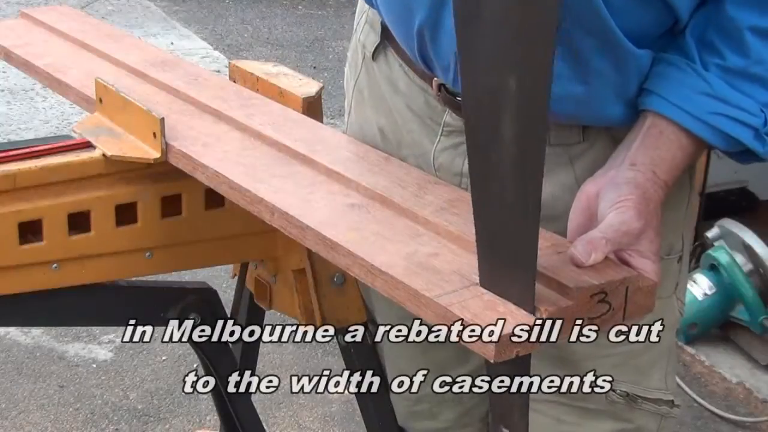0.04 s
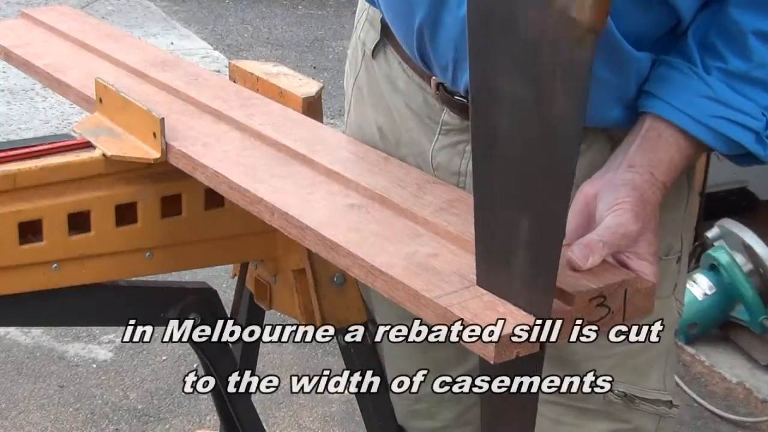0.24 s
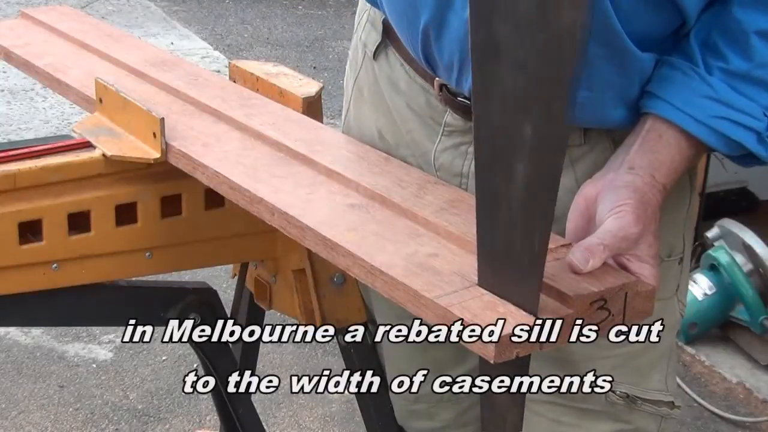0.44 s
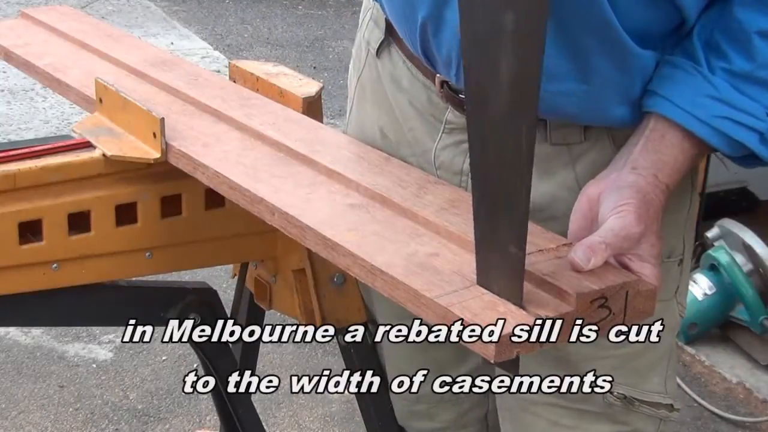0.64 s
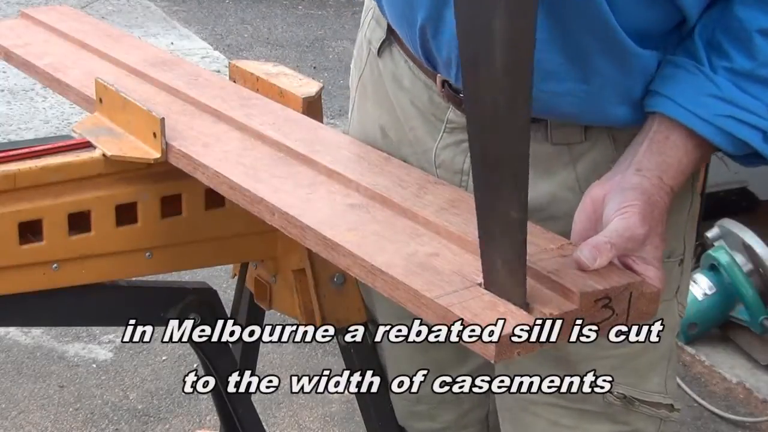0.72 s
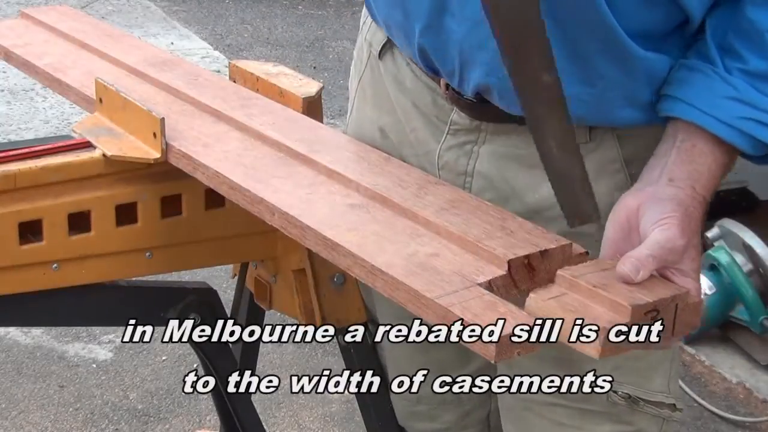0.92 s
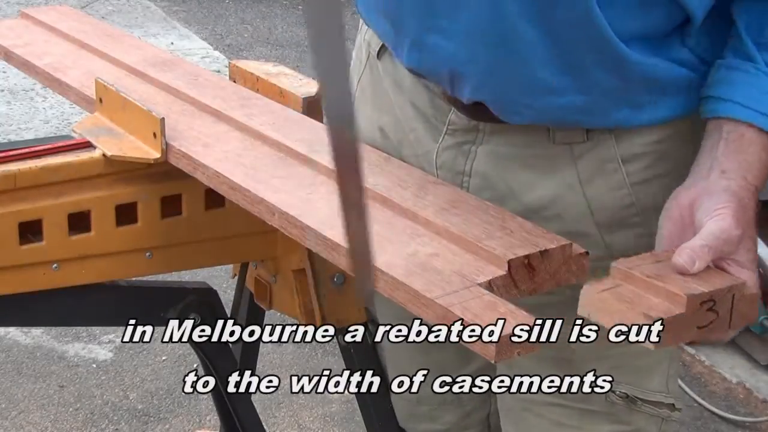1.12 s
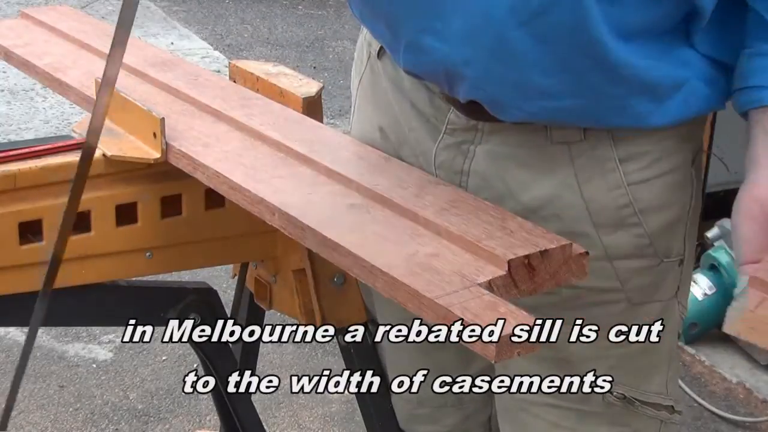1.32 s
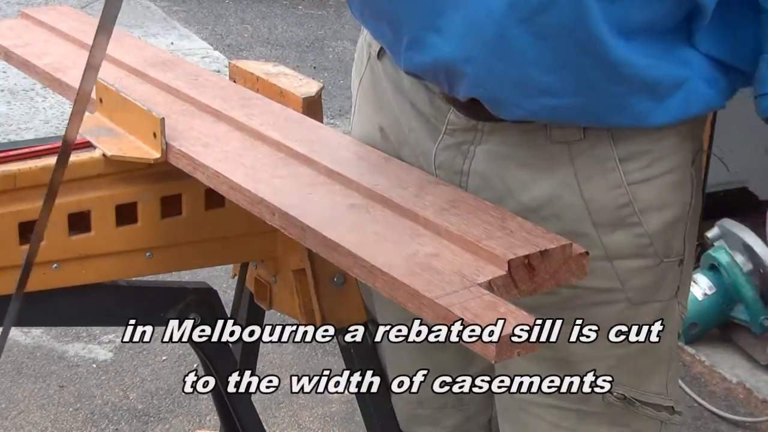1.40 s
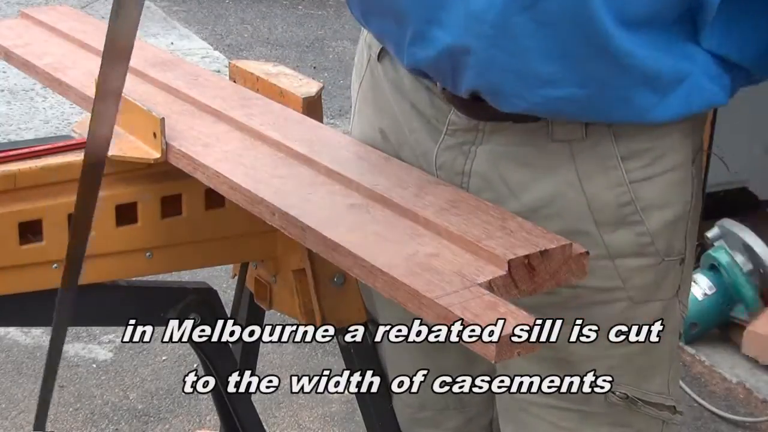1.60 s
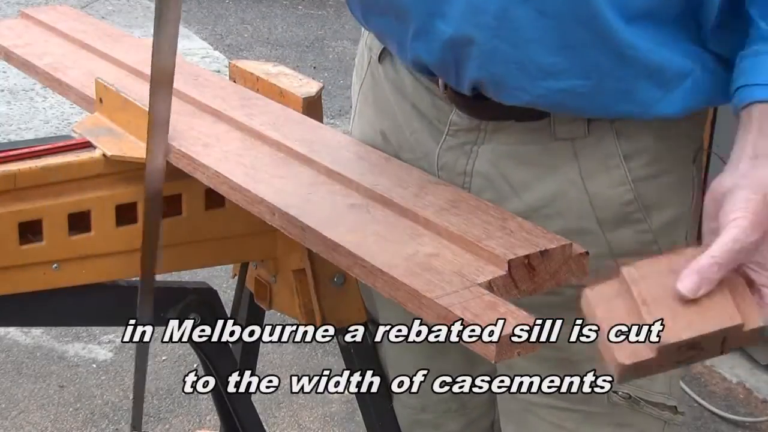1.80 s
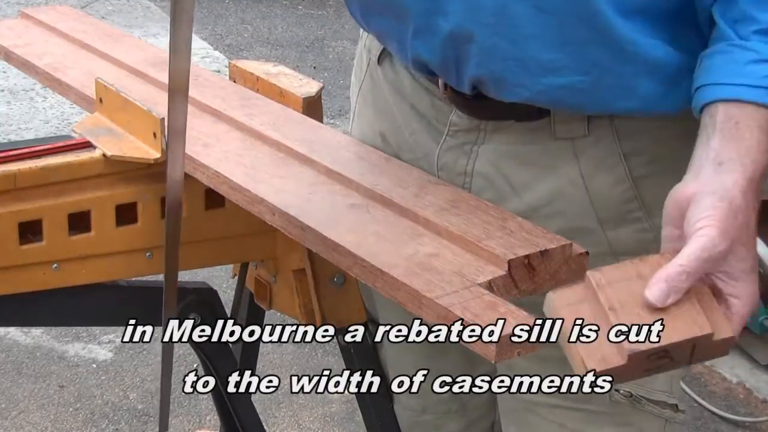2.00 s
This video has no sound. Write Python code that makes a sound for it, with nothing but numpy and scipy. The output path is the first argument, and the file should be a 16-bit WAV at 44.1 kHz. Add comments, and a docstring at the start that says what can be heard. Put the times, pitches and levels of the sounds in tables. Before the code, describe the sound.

Close outdoor handsaw strokes rasp and ring a wooden board, fading within a second to tiny damped snaps; a brief metallic tick follows over light wind buffeting and a quiet far road hum.

```python
"""Outdoors near a road: a handsaw finishes a cut through a timber board on a trestle, close to the microphone.
Random tooth bites ring the board's resonances and tear fibres, while finer grains hiss along the blade.
The sawing weakens, the board modes shift as the offcut loosens, the last fibres snap as damped knocks,
and the blade ticks against the trestle: dry cracks that ring its modes. Shaped noise makes wind buffet
the microphone and far traffic hum; a short decaying noise wash gives the reflections close by."""
import sys
import numpy as np
from scipy import signal
from scipy.fft import rfft, irfft
from scipy.io import wavfile

SR = 44100
rng = np.random.default_rng(int(sys.argv[2]) if len(sys.argv) > 2 else 0)


def unload_wav(signal):
    """Save mono or channel-first audio to the path in sys.argv[1] as 16-bit WAV at rate SR, clipped to [-1, 1]."""
    wavfile.write(
        sys.argv[1],
        SR,
        np.round(np.clip(np.atleast_2d(signal).T, -1, 1) * 32767).astype(np.int16),
    )


N = 90449  # length in samples

# The run of strokes: t/s, low board level/dB, upper board level/dB, blade hiss level/dB
STROKE_LEVELS = [(0, -29, -23, -32.5), (.044, -33.5, -29, -39), (.075, -30, -28.5, -39.5),
                 (.103, -30.5, -34, -39.5), (.116, -53, -44, -46), (.158, -45.5, -61, -73),
                 (.19, -58, -57.5, -63.5), (.252, -39, -37, -34.5), (.264, -29.5, -30.5, -37),
                 (.3, -28, -30, -33), (.35, -29, -25.5, -38), (.39, -28, -29.5, -35.5),
                 (.41, -33.5, -35.5, -49), (.44, -43, -42.5, -54), (.466, -37.5, -32, -36),
                 (.488, -37.5, -34, -39.5), (.5, -26, -25.5, -35.5), (.53, -34.5, -30, -38.5),
                 (.555, -38, -35, -40.5), (.6, -37.5, -39, -50.5), (.625, -38.5, -39.5, -46),
                 (.668, -44.5, -43.5, -56.5), (.69, -42.5, -45, -57), (.74, -51.5, -48, -54),
                 (.795, -42, -42, -60), (.831, -56, -50, -68), (.834, -44, -59, -45), (.850, -47, -42, -78),
                 (.855, -53, -49, -50), (.868, -49, -45, -72), (.88, -52, -55, -93), (.93, -56.5, -73, -74)]
# Top of the blade hiss: t/s, level/dB
TOP_HISS_LEVELS = [(0, -31.5), (.058, -41), (.098, -38.5), (.162, -76.5), (.258, -36.5), (.33, -43),
                   (.37, -71), (.418, -70), (.468, -42), (.54, -40.5), (.682, -72), (.76, -53), (.815, -72),
                   (.838, -59), (.88, -83), (.93, -80)]
# Modes of the board: f/Hz, width/Hz while sawing, drive level/dB while sawing, f/Hz with the offcut loose
BOARD_MODES = [(422.5, 30, 0, 381), (467, 35, 8.5, 414), (673, 42, 2.5, 740), (844, 54, 0.5, 953),
               (1110, 200, -11.5, 1200), (1353.6, 30, 1.5, 1500), (1714, 108, -6, 1780),
               (2360, 110, -7, 2160), (3060, 190, -13.5, 2400)]
# Spectrum of breaking fibres: f/Hz, relative level/dB per Hz
TEARING_SPECTRUM = [(200, -3), (500, -4.5), (600, -17), (900, -9), (2000, -11.5), (4500, -17)]
# Scattered part of the saw, heard at the sides: f/Hz, level/dB
SAW_SIDE_GAIN = [(1500, -17.5), (5000, -11), (13000, -8.5)]
# Wind at the microphone: t/s, level/dB
WIND_LEVELS = [(0.0, -48), (0.04, -25), (0.07, -32), (0.19, -38), (0.22, -50.5), (0.26, -40.5), (0.33, -36),
               (0.42, -59.5), (0.5, -43.5), (0.53, -53), (0.59, -47.5), (0.66, -48), (0.77, -36),
               (0.8, -44.5), (0.95, -46), (1.0, -38), (1.1, -48.5), (1.28, -53.5), (1.6, -59.5),
               (1.62, -53), (1.8, -61.5), (2.05, -59)]
# Spectrum of that wind: f/Hz, relative level/dB per Hz
WIND_SPECTRUM = [(40, -18), (85, 0.5), (115, 4.5), (140, -0.5), (220, -9), (400, -18.5)]
# Slow shoves of air: t/s, level/dB
DEEP_WIND_LEVELS = [(0, -56), (.3, -68.5), (.85, -51), (1.08, -54), (1.3, -62), (2.05, -67)]
# Spectrum of the far road: f/Hz, relative level/dB per Hz
TRAFFIC_SPECTRUM = [(200, -2), (500, -2), (1050, 1), (2000, -9), (3600, -20), (14000, -26)]
# The far road over time: t/s, hum level/dB, air hiss level/dB
TRAFFIC_LEVELS = [(.95, -54, -67.5), (1.15, -56, -66), (1.3, -56, -70), (1.68, -56.5, -74),
                  (2.05, -57.5, -72)]
# Side against mid for the far road: f/Hz, level/dB
FAR_SIDE_GAIN = [(500, -17.5), (4000, -7.5)]
# Last fibres parting: t/s, peak level/dB
FIBRE_SNAPS = [(.8364, -29), (.8400, -27), (.8418, -28), (.8455, -33), (.8547, -30)]
# Contacts of the tick: t/s, peak level/dB, tilt of the ringing/dB per octave
TICK_CONTACTS = [(1.2103, -34, -1), (1.2112, -28, -1), (1.2133, -31, -7), (1.2150, -36, 0),
                 (1.2165, -29, 6), (1.2186, -33, 5)]
# Modes of the free blade: f/Hz, relative level/dB
BLADE_MODES = [(2230, -7), (2480, -7), (4480, 1), (4730, -2), (5290, -8), (6600, -8), (7300, -11),
               (9110, -9), (10150, -10), (11640, -11)]

BITES_PER_S, BITE_SPREAD_DB = 2500, 1.5
CLUMP_DB, CLUMP_HZ = 1.5, 117  # shared unevenness of the bites
HISS_GRAINS_PER_S, HISS_SPREAD_DB = 9000, 2
BOARD_SPLIT_HZ, BLADE_SPLIT_HZ = 1200, 9800
MODE_WANDER_DB, WANDER_HZ = 2.5, 25  # each mode is driven harder and softer as the blade moves
LOOSEN_START_S, LOOSEN_END_S, PITCH_WANDER = .62, .78, .025  # pitch wander is a fraction of the frequency
LIFT_S = .03  # fade as the teeth leave the wood
WIND_SIDE_DB, DEEP_WIND_HZ = -12.5, 55
TRAFFIC_WANDER_DB, TRAFFIC_WANDER_HZ = .6, 27
SCATTER_DB, SCATTER_T60_S, SCATTER_SIDE = -10, .08, .22  # ground and clutter nearby
SCATTER_DELAY_S, SCATTER_CUT_HZ = .003, 12000
SNAP_DAMPING, SNAP_LOW_HZ, SNAP_HIGH_HZ = 5, 700, 3500  # the hand widens the modes by this factor
SNAP_MODE_SPREAD_DB = 1.8
SCRAPE_DECAY_S, CRACK_DB, RING_DB, RING_T60_S = .0007, 3, -8, .008
BLADE_SIDE = .14  # side gain of ticks and snaps


def amp(db):
    """Gain of a level in dB."""
    return 10 ** (np.asarray(db) / 20)


def rms_one(x):
    """Scale to rms 1."""
    return x / np.sqrt(np.mean(x ** 2) + 1e-20)


def in_time(rows):
    """Interpolate the columns of a table, sample by sample."""
    times, *columns = np.transpose(rows)
    return [np.interp(np.arange(N) / SR, times, column) for column in columns]


def colour(x, points):
    """Shape a sound by a spectrum, joined up over log frequency."""
    hz, db = np.transpose(points)
    f = np.maximum(np.arange(N // 2 + 1) * SR / N, 1)
    return irfft(rfft(x) * amp(np.interp(np.log(f), np.log(hz), db)), N)


def drift(corner_hz):
    """Slow random wander of rms 1: noise through two equal one-pole low-passes."""
    r = np.exp(-2 * np.pi * corner_hz / SR)
    wander = signal.lfilter([1], [1, -2 * r, r * r], rng.standard_normal(N + SR))
    return rms_one(wander[SR:])  # the first second lets the filter settle


def cut(x, hz, kind, order=4):
    """Low-pass or high-pass."""
    return signal.sosfilt(signal.butter(order, hz, kind, fs=SR, output="sos"), x)


def grains(rate, spread_db):
    """Random clicks of uneven size and either sign."""
    size = amp(spread_db * np.minimum(rng.exponential(1, N), 5))
    size = size * rng.choice([-1, 1], N)
    return size * (rng.random(N) < rate / SR) + 1e-18


def resonance(x, hz, width):
    """One resonance whose centre may move: shift it to zero, low-pass, shift back."""
    r = np.exp(-np.pi * width / SR)
    turn = np.exp(2j * np.pi * np.cumsum(hz + np.zeros(N)) / SR)
    return 2 * np.real(turn * signal.lfilter([1 - r], [1, -r], x / turn))


def board_pitch(hz, loose_hz):
    """A mode wavers with the grip of the blade and shifts as the cut nears its end."""
    centre = np.interp(np.arange(N) / SR, [LOOSEN_START_S, LOOSEN_END_S], [hz, loose_hz])
    return centre * (1 + PITCH_WANDER * drift(WANDER_HZ))


def board_ringing(clump):
    """Many teeth bite at once, each mode of the board hearing its own bites."""
    ringing = np.zeros(N)
    for hz, width, db, loose_hz in BOARD_MODES:
        bites = grains(BITES_PER_S, BITE_SPREAD_DB) * clump
        bites = bites * amp(MODE_WANDER_DB * drift(WANDER_HZ))
        ringing += amp(db) * resonance(bites, board_pitch(hz, loose_hz), width)
    return ringing


def saw_once(levels, clump):
    """Bites ring the board and tear fibres; finer grains hiss along the blade in the kerf."""
    low, high, hiss, top = levels
    ringing = board_ringing(clump)
    tearing = colour(grains(BITES_PER_S, BITE_SPREAD_DB) * clump, TEARING_SPECTRUM)
    wood = rms_one(ringing) + rms_one(tearing)
    wood = cut(cut(wood, 152, "high"), 4120, "low")
    rub, fine = (grains(HISS_GRAINS_PER_S, HISS_SPREAD_DB) * np.sqrt(clump) for _ in range(2))
    rub = cut(cut(rub, 2940, "high"), BLADE_SPLIT_HZ, "low")
    fine = cut(cut(fine, BLADE_SPLIT_HZ, "high"), 14000, "low", order=2)
    wood_low = rms_one(cut(wood, BOARD_SPLIT_HZ, "low"))
    wood_high = rms_one(cut(wood, BOARD_SPLIT_HZ, "high"))
    return low * wood_low + high * wood_high + hiss * rms_one(rub) + top * rms_one(fine)


def saw():
    """Near and scattered sawing share their clumps of bites; the teeth leave the wood after the last stroke."""
    lift_end = STROKE_LEVELS[-1][0] + LIFT_S
    touching = np.clip((lift_end - np.arange(N) / SR) / LIFT_S, 0, 1)
    levels = [amp(db) * touching for db in in_time(STROKE_LEVELS) + in_time(TOP_HISS_LEVELS)]
    clump = amp(CLUMP_DB * drift(CLUMP_HZ))
    return saw_once(levels, clump), colour(saw_once(levels, clump), SAW_SIDE_GAIN)


def wind():
    """Lumpy low noise at the microphone ports, over deeper shoves of air."""
    (level_db,), (deep_db,) = in_time(WIND_LEVELS), in_time(DEEP_WIND_LEVELS)
    mid, side = cut(colour(rng.standard_normal((2, N)), WIND_SPECTRUM), 400, "low")
    gain = amp(level_db) / np.std(mid)
    deep = cut(rng.standard_normal(N + SR), DEEP_WIND_HZ, "low")
    deep = cut(deep, 17, "high", order=2)[SR:]
    return gain * mid + amp(deep_db) * rms_one(deep), gain * side * amp(WIND_SIDE_DB)


def traffic():
    """Far road: a smooth, gently wandering hum with a thin air hiss above."""
    hum_db, air_db = in_time(TRAFFIC_LEVELS)
    far = cut(colour(rng.standard_normal((2, N)), TRAFFIC_SPECTRUM), 135, "high")
    hum, air = cut(far, 3680, "low"), cut(far, 4200, "high")
    hum_gain = amp(hum_db + TRAFFIC_WANDER_DB * drift(TRAFFIC_WANDER_HZ))
    mid, side = hum_gain * hum / np.std(hum) + amp(air_db) * air / np.std(air)
    return mid, colour(side, FAR_SIDE_GAIN)


def echoes(x):
    """Reflections close by: the dulled sound convolved with a short decaying noise wash."""
    t = np.arange(SR // 8) / SR
    wash = rng.standard_normal((2, len(t))) * amp(-60 * t / SCATTER_T60_S) * (t > SCATTER_DELAY_S)
    dull = cut(x, SCATTER_CUT_HZ, "low", order=1)
    mid, side = signal.fftconvolve(dull[None], wash, axes=1)[:, :N]
    gain = amp(SCATTER_DB) / np.sqrt(np.sum(wash[0] ** 2))
    return gain * mid, gain * SCATTER_SIDE * side


def snaps():
    """Each parting fibre knocks the loose board modes, damped by the hand."""
    out = np.zeros(N)
    for s, db in FIBRE_SNAPS:
        click = np.zeros(N)
        click[int(s * SR)] = 1
        knock = np.zeros(N)
        for hz, width, level_db, loose_hz in BOARD_MODES:
            # mode contrasts are half those of the sawing, with some chance
            gain = amp(level_db / 2 + rng.normal(0, SNAP_MODE_SPREAD_DB))
            knock += gain * resonance(click, loose_hz, SNAP_DAMPING * width)
        knock = cut(knock, SNAP_LOW_HZ, "high")
        knock = cut(knock, SNAP_HIGH_HZ, "low", order=2)
        out += amp(db) * knock / np.abs(knock).max()
    return out


def tick():
    """A short rattle of scraping contacts: each a dry crack that also rings the modes of the blade."""
    t, out = np.arange(SR // 10) / SR, np.zeros(N)
    r = amp(-60 / (RING_T60_S * SR))
    for s, db, tilt_db in TICK_CONTACTS:
        scrape = rng.standard_normal(len(t)) * np.exp(-t / SCRAPE_DECAY_S)
        strike = (t == 0) * 2 + scrape / 2
        sound = amp(CRACK_DB) * cut(scrape, 6500, "high", order=2)
        for hz, level_db in BLADE_MODES:
            w = 2 * np.pi * hz / SR
            ring = signal.lfilter([0, np.sin(w)], [1, -2 * r * np.cos(w), r * r], strike)
            sound = sound + amp(level_db + RING_DB + tilt_db * np.log2(hz / 5000)) * ring
        sound = cut(sound, 1700, "high")
        out[int(s * SR):][:len(t)] += amp(db) * sound / np.abs(sound).max()
    return out


def scene():
    """Add mid and side of every source, then turn them to left and right."""
    near, scattered = saw()
    blade = tick() + snaps()
    close = near + blade, scattered + BLADE_SIDE * blade
    mid, side = np.sum([close, echoes(near + blade), wind(), traffic()], axis=0)
    return np.array([mid + side, mid - side])


def record(dry):
    """The microphone channel's top is cut steeply, 60 dB down from 14650 Hz."""
    return signal.sosfilt(signal.cheby2(18, 60, 14650, fs=SR, output="sos"), dry)


dry = scene()
out = record(dry)
unload_wav(out)
```